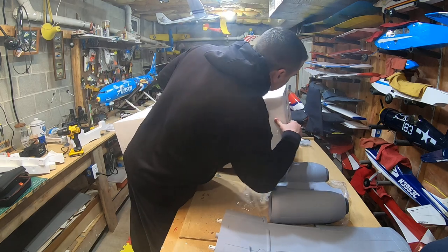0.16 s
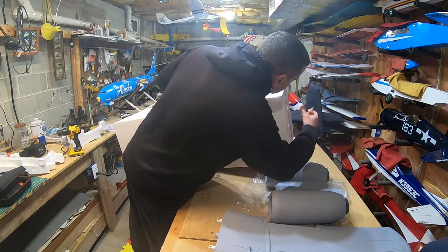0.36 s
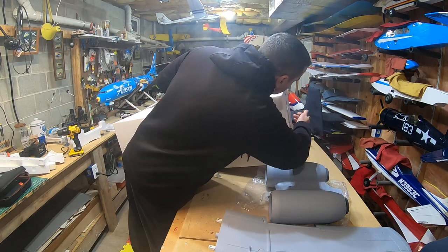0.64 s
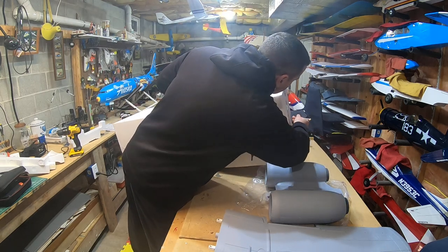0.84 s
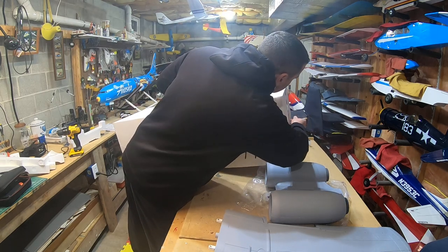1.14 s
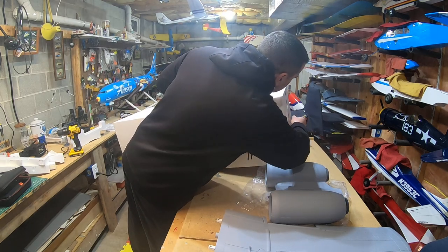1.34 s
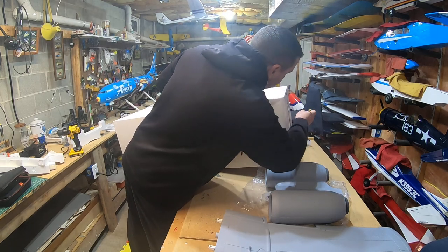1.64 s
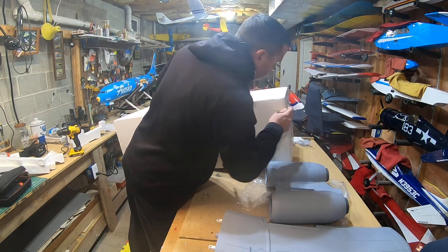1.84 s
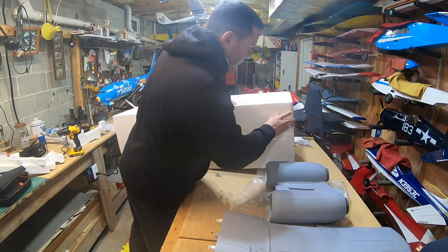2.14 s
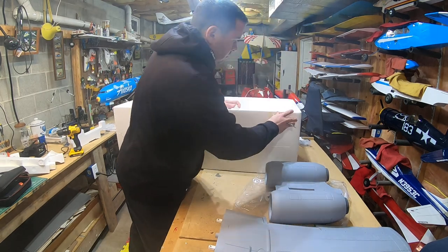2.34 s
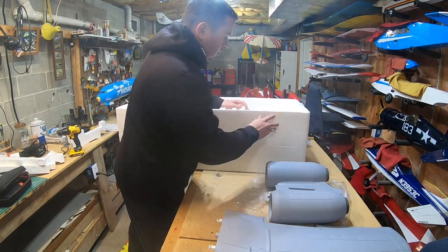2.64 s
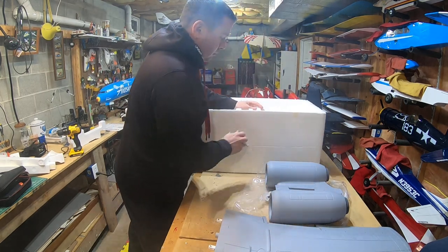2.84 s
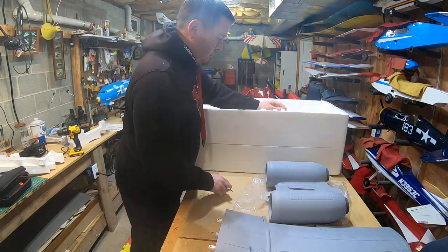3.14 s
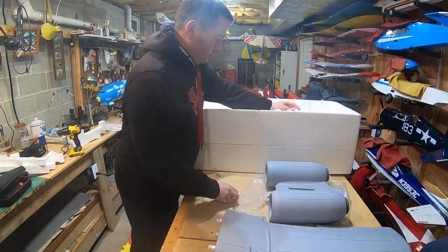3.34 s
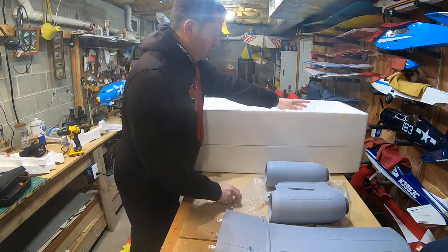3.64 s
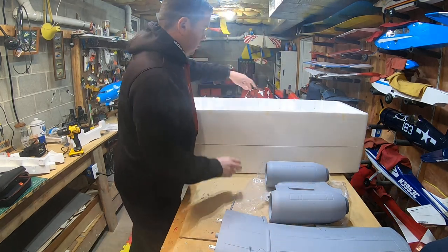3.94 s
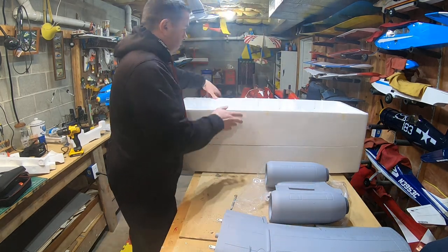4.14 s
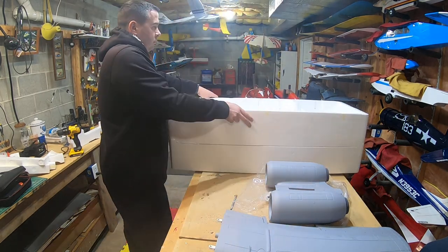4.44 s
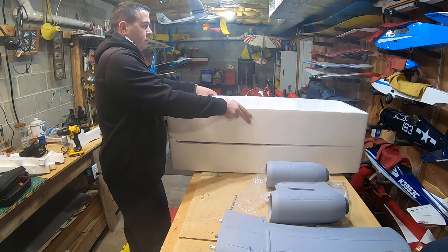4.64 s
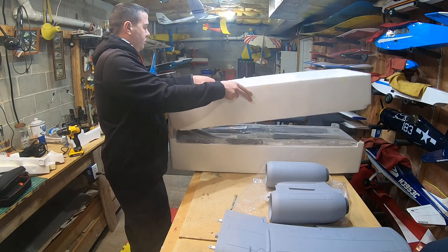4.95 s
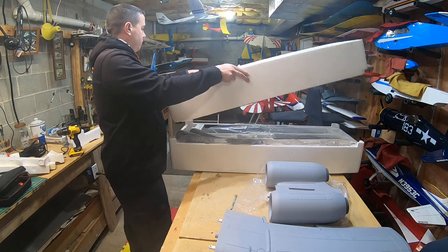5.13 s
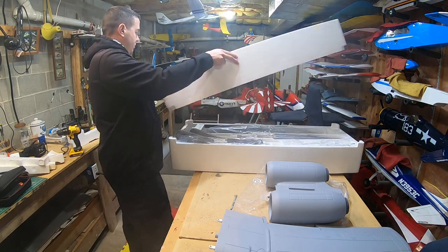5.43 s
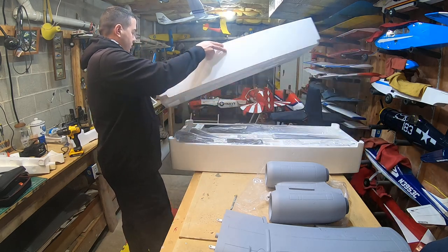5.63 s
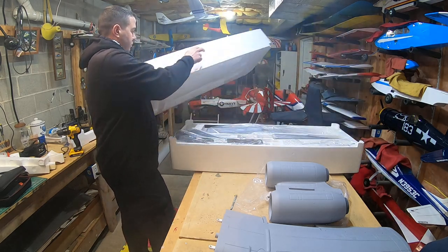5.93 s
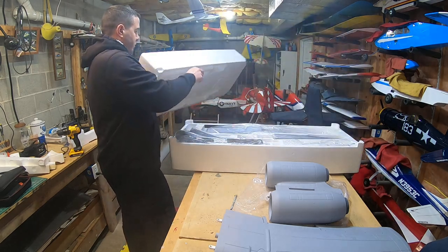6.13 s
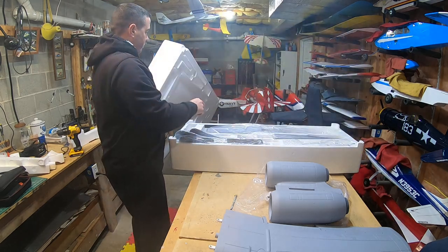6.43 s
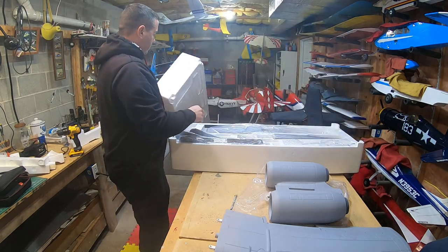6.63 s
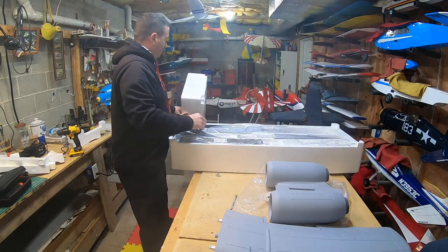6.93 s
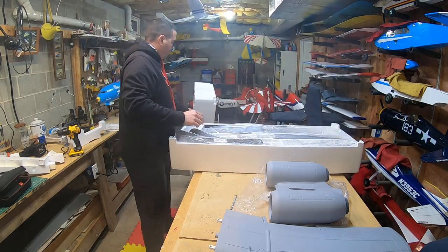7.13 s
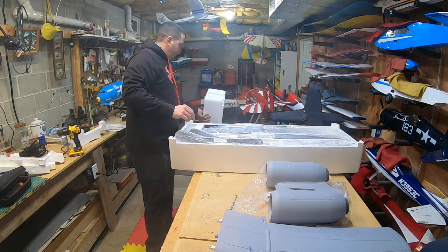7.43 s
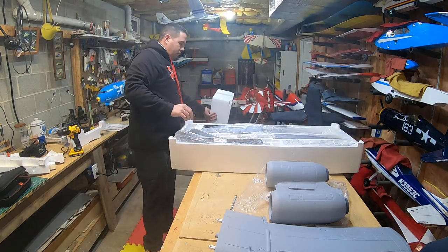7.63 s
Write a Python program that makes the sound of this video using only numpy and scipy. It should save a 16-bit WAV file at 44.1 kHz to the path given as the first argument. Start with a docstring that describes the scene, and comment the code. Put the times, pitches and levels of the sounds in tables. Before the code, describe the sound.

A polystyrene box scrapes along a workbench and is opened, ticking under the fingers and booming dully in a quiet, dry room.

```python
"""A hand brushes faintly over a hollow foam box on a workshop bench, two metres from the microphone.
The box is slid along, gripped and opened, and its lid put aside. Hands and wood rub the foam beads
into a dense crackling hiss; the box drums under the drag, ticks under the fingers and booms when
knocked, and the bench passes on deep jolts. The cluttered room is dry and almost silent."""
import sys
import numpy as np
from scipy import signal
from scipy.fft import rfft, irfft, next_fast_len
from scipy.io import wavfile
from scipy.ndimage import uniform_filter1d, map_coordinates

SR = 44100
rng = np.random.default_rng(int(sys.argv[2]) if len(sys.argv) > 2 else 0)


def wrap_up_sound(samples):
    """Save the sound to the file named by the first command line argument, as 16-bit audio."""
    columns = np.atleast_2d(samples).T
    # keep every value between -1 and 1, then stretch to whole-number steps
    tamed = np.clip(columns, -1, 1)
    steps = np.round(tamed * 32767).astype(np.int16)
    wavfile.write(sys.argv[1], SR, steps)


N = 343098


def undb(db):
    return 10 ** (np.asarray(db) / 20)


def unit(x):
    return x / np.sqrt(np.mean(x ** 2))


def curve(points):
    """Join (seconds, value) points, one value a sample."""
    return np.interp(np.arange(N) / SR, *np.transpose(points))


def colour(x, points):
    """Filter by (Hz, dB) points joined on a log-frequency axis."""
    hz, db = np.transpose(points)
    size = next_fast_len(N + SR)
    log_hz = np.log(np.arange(size // 2 + 1) * SR / size + 1)
    spectrum = rfft(np.pad(x, (0, SR // 2), "reflect"), size)
    return irfft(spectrum * undb(np.interp(log_hz, np.log(hz), db)), size)[:N]


def band(x, lo_hz, hi_hz):
    return signal.sosfilt(signal.butter(2, [lo_hz, hi_hz], "band", fs=SR, output="sos"), x)


def resonance(x, hz, width_hz):
    return signal.lfilter(*signal.iirpeak(hz, hz / width_hz, SR), x)


def add(track, start_s, sound, peak_db):
    """Lay a sound into the track at a given peak level."""
    i = int(start_s * SR)
    sound = sound[:N - i]
    track[i:i + len(sound)] += sound * undb(peak_db) / np.abs(sound).max()


def walk(per_s):
    """Glide between random levels; RMS 1."""
    hold = int(SR / per_s)
    steps = np.repeat(rng.standard_normal(N // hold + 1), hold)
    return unit(uniform_filter1d(steps, hold)[:N])


def slips(per_s, spread_db):
    """Stick-slip clicks at random moments, many small and a few large."""
    slipping = rng.random(N) < per_s / SR
    return slipping * rng.standard_normal(N) * undb(spread_db * rng.exponential(size=N))


def stroke_gains():
    """Each stroke over the foam rises, swells or fades, then falls: gains of hiss, treble and drumming."""
    # Each row: start and length in seconds, hiss in dB, swell in dB, treble and drumming in dB over hiss.
    strokes = [(0, 0.0072, -59, 5, -12, -11), (0.083, 0.017, -67.5, 1, 0, 4),
               (0.171, 0.27, -58.5, -7.5, -8.5, -8.5), (1.064, 0.029, -65.5, -4.5, -10.5, -4),
               (1.265, 0.27, -58.5, 1.5, -4.5, 5), (1.558, 0.15, -56.5, 3.5, -7.5, -17),
               (1.893, 0.16, -48.5, 1.5, -3, -14.5), (2.095, 0.278, -52, 2.5, -3, -5.5),
               (2.443, 0.18, -44.5, -5, -8, 1.5), (2.654, 0.19, -40, 2.5, -5, -7),
               (2.857, 0.409, -39, -3, -6.5, -10.5), (3.311, 0.29, -40.5, -2.5, -4.5, -9.5),
               (4.196, 0.17, -53, 3.5, -3, -7.5), (4.412, 0.11, -58.5, 7, -1.5, -3),
               (4.56, 0.07, -52.5, 3, -7.5, -2.5), (4.665, 0.047, -48.5, -0.5, 6, -2.5),
               (4.786, 0.21, -58, 2, -11.5, 7.5), (5.103, 0.15, -61, 4.5, -13.5, -6),
               (5.331, 0.14, -60, 6, -13.5, -5), (5.503, 0.31, -52, -8, -6, -2),
               (5.943, 0.094, -63.5, -2, -14, 4), (6.107, 0.4, -52.5, -8, -11.5, -1),
               (6.435, 0.043, -57, 5.5, -13.5, -10), (6.65, 0.081, -60, 2.5, -12.5, 7),
               (6.883, 0.15, -63.5, -0.5, -3, -1), (7.122, 0.17, -62.5, -12.5, -3.5, 1.5),
               (7.28, 0.048, -72, 3.5, -10, 7.5), (7.448, 0.013, -53, 0, -9, 7.5),
               (7.564, 0.052, -56, 0.5, -14.5, 12), (7.72, 0.12, -56.5, 4.5, -6.5, 15)]
    start, length, hiss_db, swell_db, treble_db, drum_db = np.transpose(strokes)[:, :, None]
    rise_db_per_s, hiss_fall_db_per_s, drum_fall_db_per_s = 267, 277, 152
    t = np.arange(0, N, 64) / SR
    before, after = np.maximum(start - t, 0), np.maximum(t - start - length, 0)
    db = hiss_db + swell_db * np.clip((t - start) / length, 0, 1) - rise_db_per_s * before
    gains = []
    for over_db, fall in (0, hiss_fall_db_per_s), (treble_db, hiss_fall_db_per_s), (drum_db, drum_fall_db_per_s):
        each = undb(np.maximum(db - fall * after, -150) + over_db)
        gains.append(np.interp(np.arange(N) / SR, t, np.linalg.norm(each, axis=0)))
    return gains


def wandering_contact(x, cell_hz, cell_s, spread_db):
    """The contact wanders over the foam, so narrow resonances come and go."""
    hz, s, spectra = signal.stft(x, SR, nperseg=1024)
    grid = np.meshgrid(hz / cell_hz, s / cell_s, indexing="ij")
    field = map_coordinates(rng.standard_normal((256, 256)), grid, order=1, mode="wrap")
    return signal.istft(spectra * undb(spread_db * field), SR, nperseg=1024)[1][:N]


def rubbing(flicker):
    """Foam beads slip in their thousands under a hand or on the bench."""
    # Spectra of foam under a hand and on wood. Each row: frequency in Hz, level in dB.
    foam_on_hand = [(210, -29), (350, -18.5), (520, -5), (572, -6.5), (3170, -7), (4420, -12), (7830, -9),
                    (9930, -21.5), (15500, -35)]
    foam_on_wood = [(210, -51), (350, -1.5), (997, -11.5), (1580, -3), (1820, -16), (2460, -3.5),
                    (7950, -10.5), (15500, -33.5)]
    # Walls that sing in the slide. Each row: pitch in Hz, width in Hz, gain in dB.
    wall_modes = [(2360, 150, 8), (3630, 620, -9)]
    # The box slides. Each row: time in seconds, the bench's share of the rub from 0 to 1.
    slide = [(2.45, 0), (2.76, 0.2), (2.81, 0.62), (3.6, 0.37), (3.7, 0)]
    hiss, treble, _ = stroke_gains()
    beads = slips(per_s=12000, spread_db=-1.6) * flicker
    hand, bench = colour(beads, foam_on_hand), colour(beads, foam_on_wood)
    walls = sum(undb(db + 3 * walk(4.1)) * resonance(bench, hz, width) for hz, width, db in wall_modes)
    share = curve(slide)
    rub = (1 - share) * unit(hand) + share * unit(bench + walls)
    rub = wandering_contact(rub, cell_hz=110, cell_s=0.06, spread_db=3.2)
    dull, bright = colour(rub, [(4500, -1), (7000, -24.5)]), colour(rub, [(4000, -6), (6000, 2.5)])
    # A bright stroke presses lightly and leaves the lower hiss thin.
    low_gain = (treble / hiss * undb(10.5)) ** -0.6
    dull += (low_gain - 1) * colour(dull, [(1200, 0), (2200, -30)])
    return hiss * unit(dull) + treble * unit(bright)


def box_ring(tilt_db, cut_order):
    """The hollow box answers one push; harder contact wakes the upper modes, and bass does not radiate."""
    # The box's modes. Each row: pitch in Hz, level in dB, seconds to fall 60 dB.
    modes = [(147.5, -11, 0.18), (162, -1.5, 0.056), (207, -1, 0.11), (238.5, 5.5, 0.049), (318, 7, 0.038),
             (415, -5.5, 0.052), (508, -7.5, 0.029), (675, -2, 0.014), (823, -11, 0.033)]
    t = np.arange(SR // 4) / SR
    ring = np.zeros(len(t))
    for hz, db, t60 in modes:
        octaves = np.clip(np.log2(hz / 200), 0, 1.5)
        ring += undb(db + tilt_db * octaves) * np.sin(2 * np.pi * hz * t) * 1000. ** (-t / t60)
    return signal.sosfilt(signal.ellip(cut_order, 1, 45, 138, "high", fs=SR, output="sos"), ring)


def drumming(flicker):
    """Slower, heavier slips shake the whole box."""
    _, _, drum = stroke_gains()
    shake = slips(per_s=1500, spread_db=1) * flicker
    return drum * unit(signal.fftconvolve(shake, box_ring(tilt_db=1.5, cut_order=7))[:N])


def room_tone(level_db):
    """The faint, steady noise of the empty workshop."""
    # Its spectrum. Each row: frequency in Hz, level in dB.
    workshop_air = [(25, 0), (64, -8.5), (186, 9), (450, -10), (749, 0), (1500, -11.5), (3500, -17.5),
                    (8000, -16.5), (15000, -47)]
    return undb(level_db) * unit(colour(rng.standard_normal(N), workshop_air))


def finger_ticks():
    """The foam's skin tears or is flicked: a crack around one pitch inside a broad scatter. The row at 2.755 s
    is instead the corner of the box hissing around 5 kHz as the slide gets going."""
    # Each row: start in seconds, peak in dB, centre in Hz, seconds to fall 60 dB, rise in ms.
    ticks = [(0.593, -55.5, 2690, 0.18, 1.1), (1.214, -24.5, 3270, 0.085, 0.91),
             (1.300, -37, 3460, 0.07, 4), (1.382, -32, 3380, 0.098, 0.52), (1.452, -40.5, 3300, 0.06, 1.1),
             (1.473, -37, 3410, 0.084, 1.2), (1.502, -34.5, 2350, 0.083, 0.99),
             (1.510, -34, 2980, 0.14, 3.9), (2.755, -29, 5300, 0.06, 23), (3.697, -36, 3100, 0.0092, 2.2),
             (3.837, -48.5, 5540, 0.099, 5.4), (3.89, -44.5, 3160, 0.01, 2), (4.836, -53, 1460, 0.055, 1.5),
             (4.930, -41, 2000, 0.07, 3.7), (4.984, -42.5, 2000, 0.03, 1.4),
             (5.008, -36.5, 1380, 0.099, 2.7), (5.034, -38.5, 1760, 0.27, 3), (7.210, -43, 1490, 0.1, 4),
             (7.543, -44, 2500, 0.038, 1.1), (7.567, -47.5, 3230, 0.058, 1), (7.676, -40, 1160, 0.084, 3)]
    out, t = np.zeros(N), np.arange(SR // 6) / SR
    for start, peak_db, hz, t60, rise_ms in ticks:
        after = np.maximum(t - rise_ms / 1000, 0)
        noise = rng.standard_normal(len(t)) * np.minimum(t * 1000 / rise_ms, 1)
        crack = band(noise * 1000. ** (-after / min(t60, 0.027)), hz / 1.15, hz * 1.15)
        scatter = band(noise * 1000. ** (-after / max(t60, 0.01)), hz / 3.7, hz * 2.33)
        add(out, start, crack + undb(-6) * scatter, peak_db)
    return signal.sosfilt(signal.butter(3, 9500, fs=SR, output="sos"), out)


def knocks():
    """A soft push rings the box, which rebounds in time with its own swing."""
    # Each row: start in seconds, peak in dB, hardness in dB, bouncing time in ms.
    blows = [(1.216, -33.5, 1.5, 21), (1.38, -41, -19, 105), (1.509, -38, -7.5, 37), (1.789, -48, -17, 7.9),
             (1.9, -34.5, -5.5, 48), (2.036, -40, -8, 17), (2.389, -24, -21, 21.4), (2.447, -37, -3, 16),
             (3.663, -42.5, -4, 3.5), (3.726, -31, 20, 1.7), (3.757, -36.5, -7, 0.84), (4.113, -54, 8, 13),
             (4.264, -30.5, -8.5, 20), (4.309, -30.5, -19, 18), (4.403, -41.5, -23, 2.2),
             (4.501, -39.5, -20, 17), (4.585, -43.5, -29, 11), (4.892, -33.5, -26, 10.6),
             (5.032, -13, -14, 16.4), (5.801, -41.5, 2, 22.4), (5.946, -48.5, 26, 13), (6.046, -47, 11, 17),
             (6.24, -43.5, -17.5, 120), (6.746, -41.5, -12.5, 23), (7.421, -38.5, -46, 25),
             (7.463, -38.5, -13, 46), (7.675, -26, -2.5, 35), (7.742, -39, -17, 14)]
    rebound_ms, jitter_ms = 6.5, 2.24
    out = np.zeros(N)
    for start, peak_db, hardness_db, bounce_ms in blows:
        ms = np.arange(16) * rebound_ms + jitter_ms * rng.random(16)
        rebounds = np.zeros(SR // 8)
        rebounds[(ms * SR / 1000).astype(int)] = np.clip((bounce_ms - ms) / rebound_ms + 1, 0, 1)
        # Dull knocks come from a softer, longer contact.
        contact = np.hanning(int(SR / 700 * undb(-hardness_db / 3)))
        ring = box_ring(tilt_db=hardness_db + 18, cut_order=3)
        add(out, start, signal.fftconvolve(np.convolve(rebounds, contact), ring), peak_db)
    return out


def bench_jolts():
    """The bench shudders below the box's own pitch."""
    # Each row: start in seconds, peak in dB, length in seconds.
    jolts = [(1.232, -56.5, 0.3), (1.898, -48, 0.048), (2.389, -35, 0.078), (2.52, -54, 0.12),
             (4.262, -38.5, 0.072), (4.642, -57, 0.06), (4.89, -53, 0.031), (5.041, -45, 0.069),
             (7.403, -42, .13), (7.706, -42, 0.065)]
    out = np.zeros(N)
    for start, peak_db, length in jolts:
        age = np.arange(SR) / SR / length
        shudder = rng.standard_normal(SR) * np.minimum(8 * age, 1) * np.exp(-age ** 3)
        add(out, start, band(shudder, lo_hz=34.6, hi_hz=93), peak_db)
    return out


def reflections(x, t60_s):
    """Dense reflections die away in the cluttered room."""
    t = np.arange(SR // 3) / SR
    tail = rng.standard_normal(len(t)) * 1000. ** (-t / t60_s)
    return signal.fftconvolve(x, tail / np.linalg.norm(tail))[:N]


def scene():
    """The bench from two metres: mid and side, turned to left and right."""
    # Stereo width. Each row: frequency in Hz, gain of the side in dB.
    width = [(40, -4.5), (150, -14), (300, -19), (600, -9.5), (1200, -4), (2500, -11), (9000, -0.5)]
    # Where the hands are. Each row: time in seconds, left minus right in dB.
    hand_position = [(2.2, -0.5), (3.6, -2), (4.2, 0.3)]
    rub_flicker, drum_flicker = undb(0.8 * walk(40)), undb(2 * walk(25))
    hits = knocks() + finger_ticks()
    mid = rubbing(rub_flicker) + drumming(drum_flicker) + bench_jolts() + hits
    mid += undb(-7) * reflections(hits, t60_s=0.19)
    # Rubbing spreads over the box and hits return from the shelves, so each port hears its own share.
    side = rubbing(rub_flicker) + drumming(drum_flicker) + bench_jolts() + reflections(hits, t60_s=0.094)
    mid += room_tone(-74.5)
    side = colour(side, width) + room_tone(-69)
    pan_db = curve(hand_position)
    return np.array([(mid + side) * undb(pan_db / 2), (mid - side) * undb(-pan_db / 2)])


def record(dry):
    """The microphone ports have a treble resonance; the top is cut."""
    ports = dry + resonance(dry, hz=9880, width_hz=320)
    return signal.sosfilt(signal.ellip(10, 0.2, 80, 15550, fs=SR, output="sos"), ports)


dry = scene()
out = record(dry)
wrap_up_sound(out)
```